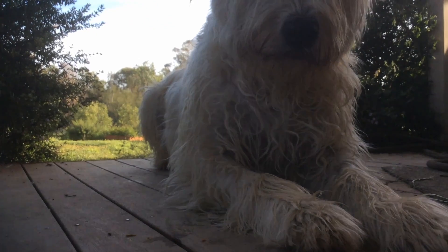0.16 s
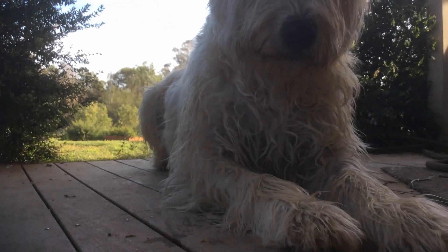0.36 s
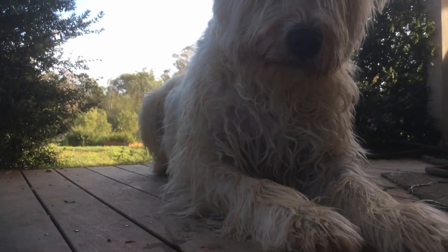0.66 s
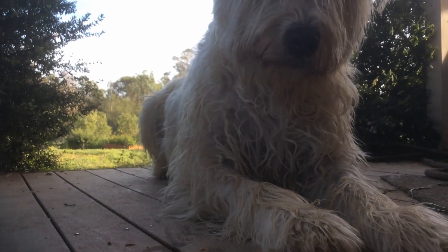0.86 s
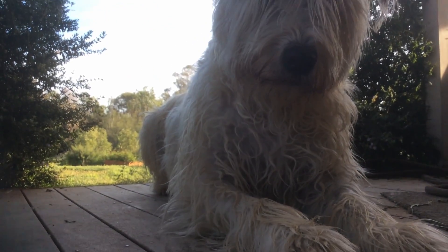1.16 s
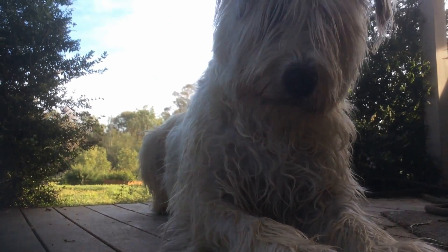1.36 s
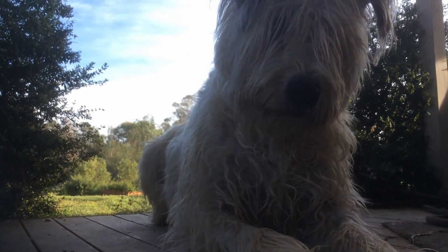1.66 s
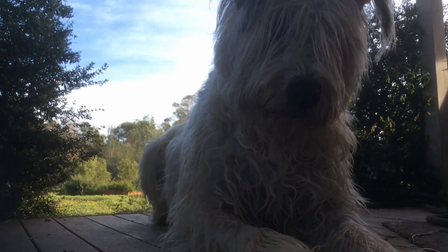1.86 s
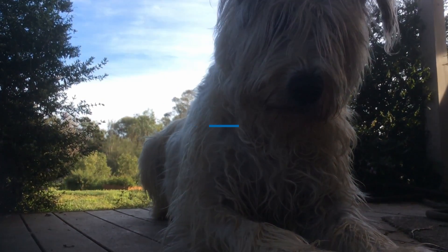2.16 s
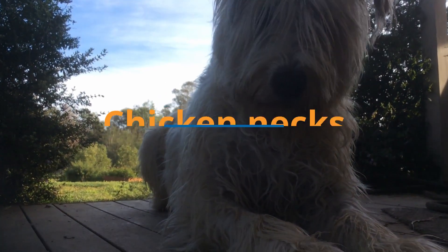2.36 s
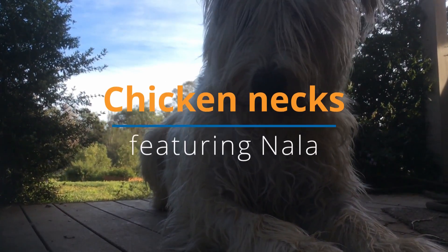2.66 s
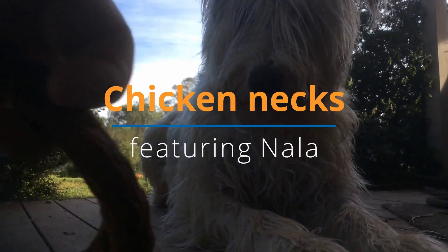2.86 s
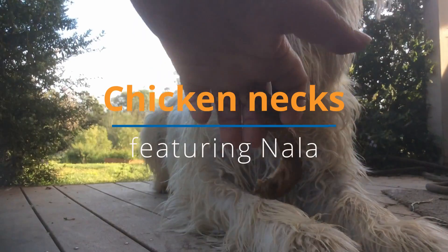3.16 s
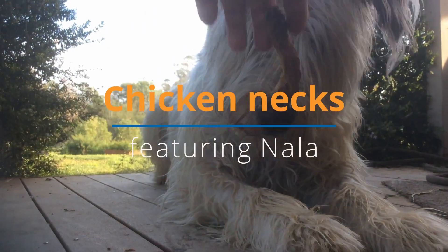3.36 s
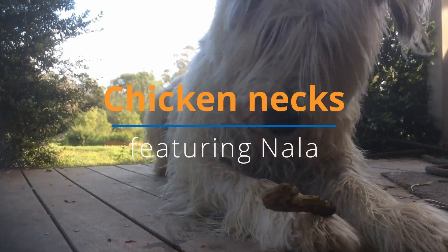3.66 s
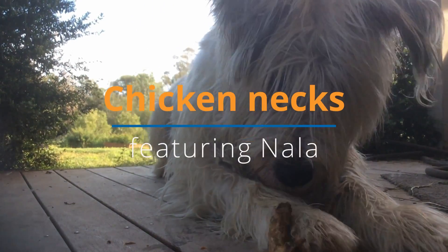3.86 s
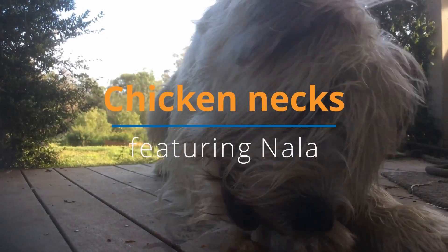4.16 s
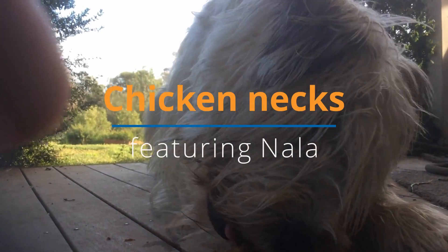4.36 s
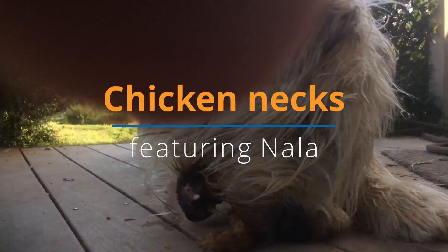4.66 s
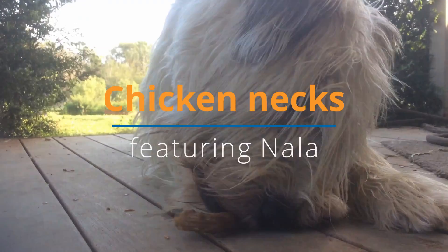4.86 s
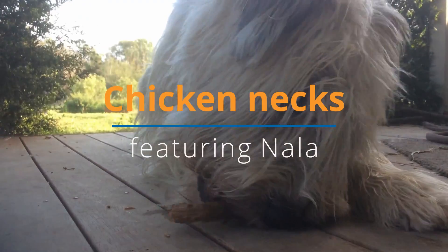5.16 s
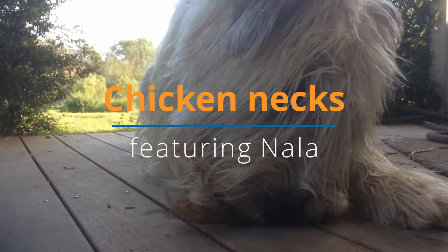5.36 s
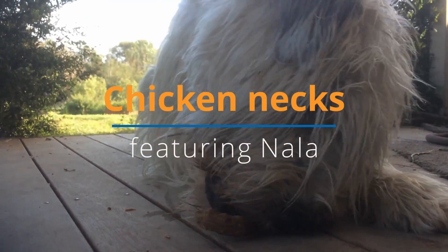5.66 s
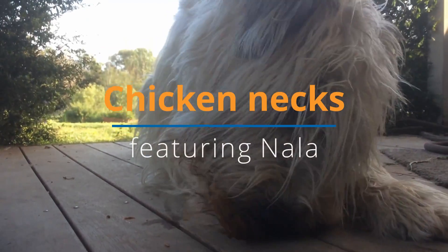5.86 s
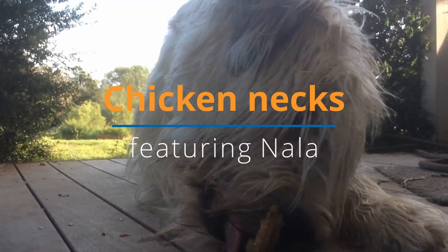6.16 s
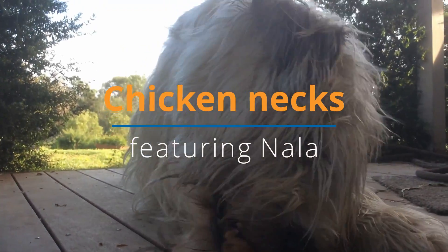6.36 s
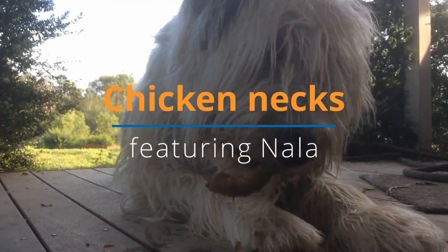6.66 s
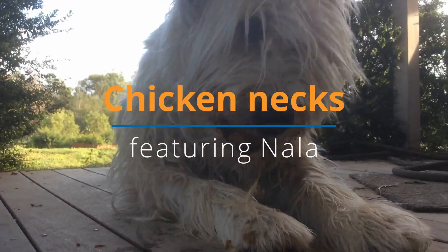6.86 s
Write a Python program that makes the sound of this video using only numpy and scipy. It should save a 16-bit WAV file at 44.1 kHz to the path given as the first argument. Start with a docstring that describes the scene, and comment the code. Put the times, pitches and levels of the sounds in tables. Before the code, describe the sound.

A quiet outdoor rush with faint hiss and sparse, distant bird chirps runs throughout. From 0.1 s fingers handle a camera right at the microphone: a loud hollow knock near 0.18 s, smaller taps until 0.6 s, then rubbing strokes and gritty scuffs, firmest around 1.2 to 1.6 s and 2.0 s. Tiny nail ticks precede a hollow plastic clack at 2.44 s as it rocks to rest on wooden boards by 2.6 s. A calm gap holds a bird chip at 2.76 s. At 3.74 s a dried bony treat hits the deck, bouncing again at 3.95 s. From 4.1 s a dog's muzzle shuffles and short jerky scrapes sound; a brief sniff comes near 4.8 s. Teeth knock and crack from 4.9 s, busy at 5.3 to 5.45 s, with the sharpest crunches at 5.9 to 6.05 s and more around 6.45 s. A stuttering drag follows at 6.73 s, then soft wet mouth smacks near 6.95 s.

```python
"""Over a quiet outdoor rush, fingers knock and rub a camera, which is set down on a wooden veranda.
A dried bony treat then drops and bounces; a dog noses it, drags it and cracks it between its teeth.
Struck bodies are sums of damped modes and band-passed bursts, friction is shaped noise of uneven grain,
and breaking is noise of very unequal grains. Small birds, gliding sines, call in the garden behind.
"""
import sys
import numpy as np
from scipy import signal
from scipy.fft import rfft, irfft, next_fast_len
from scipy.io import wavfile
from scipy.ndimage import map_coordinates

SR = 44100
rng = np.random.default_rng(int(sys.argv[2]) if len(sys.argv) > 2 else 0)


def master_out(mix):
    """Clip the mix to full scale and print it as 16-bit PCM to the path in sys.argv[1]."""
    frames = np.transpose(np.atleast_2d(mix))
    ceiling = np.clip(frames, -1, 1)
    pcm = np.round(ceiling * 32767).astype(np.int16)
    wavfile.write(sys.argv[1], SR, pcm)


N = 309582
CLOCK = np.arange(N) / SR
T = np.arange(SR // 3) / SR  # time within one blow
TOP_HZ = 16300  # upper band limit

# Levels inside one blow are relative to its force; spectra and modes give relative levels.

# Garden. Bird notes: start_s, length_s, start_hz, middle_hz, end_hz, level_db, pitch_tremble_hz
BIRD_NOTES = [(0.254, 0.053, 6900, 5540, 5400, -58, 240), (1.099, 0.15, 5240, 5250, 5080, -60.5, 340),
              (1.107, 0.097, 3500, 3420, 3480, -62.5, 230), (1.117, 0.082, 2690, 2620, 2600, -64, 220),
              (3.18, 0.46, 1300, 1273, 1217, -66, 22.1), (3.294, 0.032, 5380, 5130, 5100, -68.5, 130),
              (3.382, 0.049, 4800, 4560, 4570, -68.5, 129), (3.521, 0.037, 7200, 7240, 7220, -68.5, 110),
              (3.603, 0.021, 7300, 7190, 7100, -66.5, 120), (3.685, 0.05, 5150, 4750, 5070, -59, 130),
              (4.058, 0.025, 4590, 4450, 4350, -65, 100), (4.889, 0.081, 9800, 9640, 9350, -62, 50),
              (5.168, 0.2, 9140, 9470, 9220, -58.5, 49.5), (5.564, 0.06, 5760, 5050, 4740, -58, 70),
              (5.64, 0.11, 4100, 3050, 2580, -61, 55), (5.677, 0.02, 3350, 3480, 3450, -60, 50),
              (5.719, 0.045, 3080, 3450, 3670, -57, 69.4)]
# bands of one short, harsh bird chip: band_hz, level_db
CHIP_BANDS = [(2230, -6.5), (3260, -2), (5500, -7), (8970, -5.5)]
CHIP_AT_S, CHIP_DB, CHIP_T60_S, CHIP_WANDER_HZ = 2.757, -59, 0.13, 451
BIRD_FLUTTER_DB = 1.5  # the notes waver on their way through the trees
# spectrum of the outdoor rush: frequency_hz, density_db_per_hz
RUSH_SPECTRUM = [(25, -27.5), (55, -8.5), (84, -0.5), (135, -15.5), (200, -14.5), (270, -17), (600, -23.5),
                 (1300, -29.5), (2200, -38.5), (5000, -40), (9000, -37), (16000, -47)]
RUSH_DB = -57
# level of a faint hiss: time_s, level_db
HISS_LEVEL = [(0, -56.5), (.7, -67.5), (2.3, -65.5), (2.7, -74), (3.9, -69), (4.5, -55.5), (5.2, -66),
              (6.4, -57.5), (7, -56.5)]
# spectrum of the hiss: frequency_hz, density_db_per_hz
HISS_SPECTRUM = [(1000, 3.0), (4500, -2.0), (7000, -3.5), (9300, 1.5), (12000, -9.5), (16000, -19.5)]
# decay of the roof and wall reflections: frequency_hz, t60_s
VERANDA_DECAY = [(150, 0.65), (600, 0.22), (2500, 0.12), (6000, 0.064), (14000, 0.14)]

# Camera. Finger knocks: start_s, force_db, sharpness_db, hollow_hz
FINGER_KNOCKS = [(0.11, -43.5, -25, 415), (0.169, -33.5, -4, 590), (0.1792, -14.5, -6.5, 684),
                 (0.191, -25.5, -30, 585), (0.4174, -29.5, -5.5, 640), (0.5053, -24.5, -3.5, 645),
                 (0.556, -33, -42, 560), (0.5899, -26.5, -11.5, 648), (0.603, -37.5, -6, 643),
                 (0.61, -37.5, -11, 655), (0.87, -42.5, -38, 456), (1.213, -41.5, -14, 522),
                 (1.352, -44, -11, 522), (1.614, -34, -36, 554), (1.691, -32.5, -27, 560),
                 (2.176, -38.5, -8, 346), (2.251, -40.5, -4.5, 705), (2.295, -38.5, -15, 600),
                 (2.3478, -31, -25, 458), (2.3723, -35, -26, 484), (2.426, -35.5, -13, 454)]
HAND_T60_S = 0.02  # the hand damps the housing
# a fleshier knock sounds lower and thuds more
THUD_DB, THUD_HZ, THUD_DB_PER_OCTAVE = -10.5, 510, 31.5
# camera rocking to rest on the deck: start_s, force_db, sharpness_db, hollow_hz, t60_s
CAMERA_LANDINGS = [(2.4375, -17.5, 2.5, 699, 0.053), (2.446, -27, 0, 546.6, 0.2),
                   (2.461, -32.5, -19, 570, 0.11), (2.468, -37, -11, 720, .05),
                   (2.497, -37.5, -7, 696, 0.079), (2.51, -34, 4, 582, 0.1), (2.535, -33, -21, 684, .04),
                   (2.5453, -25, -12.5, 546, 0.13), (2.6007, -33, -13.5, 715, 0.063)]
LANDED_THUD_DB = -6  # thud of the deck under the camera
TICK_DB = -19.5  # treble tick under the clack of the case
HOLLOW_WANDER_HZ = 5.6  # the loose housing never rings quite true
# modes of the camera on the deck: mode_hz, level_db, t60_s (before damping)
STAND_MODES = [(116, -19, 0.15), (193.4, -1, 0.26)]
# modes of the camera's case: mode_hz, level_db, t60_s (before damping)
CASE_MODES = [(1025, -2, 0.018), (1136, 6, 0.066), (1414, 1, 0.045), (2047, 1.5, 0.025),
              (2586, -9.5, 0.028), (3266, -7.5, 0.032)]
# fingernail ticks on the housing: start_s, level_db, ring_hz
NAIL_TICKS = [(0.1786, -35, 5570), (2.237, -54.5, 8300), (2.2573, -47, 9570), (2.2849, -33.5, 10050),
              (2.294, -47, 9550), (2.306, -50, 9500), (2.317, -46.5, 9630), (2.326, -46.5, 9000),
              (2.348, -50, 9500), (2.362, -51.5, 9260), (2.372, -51.5, 8930)]
# finger strokes over the housing: start_s, length_s, rub_db, rumble_db (before the common trim)
FINGER_STROKES = [(0.095, 0.12, -43.5, -40), (0.305, 0.092, -36, -39.5), (0.497, 0.13, -35, -45.5),
                  (0.77, 0.089, -52, -62), (0.865, 0.051, -45, -41), (0.925, 0.033, -42, -44),
                  (1.045, 0.2, -48.5, -84), (1.205, 0.027, -34, -52), (1.448, 0.14, -32.5, -48.5),
                  (1.47, 0.055, -33, -44.5), (1.6, 0.093, -36, -39.5), (1.79, 0.0185, -46.5, -42.5),
                  (1.89, 0.68, -71, -53), (1.98, 0.03, -44, -60.5), (2.012, 0.093, -28.5, -40.5),
                  (2.13, 0.28, -41.5, -38), (2.48, 0.19, -54, -41)]
STROKE_ATTACK_S, STROKE_SAG_DB_PER_S, STROKE_RELEASE_S = 0.011, 21.5, 0.11
# the resting grip (before the common trim), until the hand leaves
HOLD_RUB_DB, HOLD_RUMBLE_DB, LET_GO_S = -61, -65, 2.72
# spectra of skin rubbing, of the low rumble and of a firm scuff: frequency_hz, density_db_per_hz
RUB_SPECTRUM = [(250, -22.5), (420, -5.5), (550, 8), (660, 3), (780, 3), (1050, -15.5), (1350, -8.5),
                (1600, -11.5), (1950, -15), (2300, -28), (3200, -27), (5000, -34), (10000, -30),
                (16000, -44)]
RUMBLE_SPECTRUM = [(50, -53), (110, -0.5), (200, -4.5), (340, 7.5), (450, -22.5), (700, -37)]
SCUFF_SPECTRUM = [(500, -26.5), (900, 1.5), (1800, 4), (2600, -16), (6000, -19.5), (16000, -30)]
STICK_SLIP_DB, STICK_SLIP_RATE = 3.5, 520  # skin catches finely on the housing (dB, catches a second)
SCUFF_DB, SCUFF_GRAIN_DB = -16.5, 7  # a firm stroke also scuffs, brighter and grittier

# Dog. Muzzle pushes: start_s, length_s, shuffle_db, fur_db (before the trim of each)
MUZZLE_PUSHES = [(4.1, 0.12, -34.5, -51.5), (4.22, .15, -62, -48.5), (4.68, 0.23, -50, -43.5),
                 (4.96, 0.097, -35.5, -48.5), (5.16, 0.031, -31.5, -81), (5.38, 0.15, -31.5, -49.5),
                 (5.67, 0.12, -35.5, -75), (6.06, 0.021, -32, -72), (6.13, 0.13, -59, -49),
                 (6.3, 0.051, -47.5, -86), (6.52, 0.23, -44.5, -49), (6.73, 0.15, -63, -41.5)]
PUSH_ATTACK_S, PUSH_SAG_DB_PER_S, PUSH_RELEASE_S = 0.018, 29, 0.19
REST_SHUFFLE_DB, REST_FUR_DB = -49.5, -61  # the lowered head is never quite still (before the trims)
# spectra of muzzle on wood, of fur and of air in the nose: frequency_hz, density_db_per_hz
SHUFFLE_SPECTRUM = [(50, 7.5), (110, -3), (270, 7), (420, 3.5), (850, 4.5), (1200, -21.5), (1700, -15),
                    (3000, -44.5)]
FUR_SPECTRUM = [(1000, 5), (2000, 15.5), (4700, 12), (6500, 8.5), (9000, 9), (12000, -14), (16000, -14.5)]
NOSE_SPECTRUM = [(410, -47), (700, 0), (1400, 3), (1680, 0), (2240, 11.5), (2700, 5), (3070, 8.5),
                 (5470, 2.5), (7990, 8.5), (16000, -8.5)]
# level of one long sniff: time_s, level_db
SNIFF_LEVEL = [(4.48, -70), (4.58, -61), (4.73, -55), (4.78, -41), (4.82, -39.5), (4.845, -52.5),
               (4.87, -71)]
# wet clicks of the lips parting: start_s, level_db
LIP_CLICKS = [(5.3712, -38), (5.4523, -49.5), (5.8679, -39), (5.8815, -37.5), (5.8848, -35)]
# soft hollow smacks of the mouth: start_s, level_db, cavity_hz
MOUTH_SMACKS = [(6.921, -40, 604), (6.973, -38.5, 665), (6.998, -44.5, 872), (7.011, -41, 776)]
SMACK_ATTACK_S, SMACK_T60_S = 0.0014, 0.036

# Treat. Drags over the wood: start_s, length_s, first_stick_s, rasp_db, tick_db (before the mix of each jerk)
TREAT_DRAGS = [(4.122, .056, 0.015, -59, -59.5), (4.204, .055, .014, -60, -57.5),
               (4.311, .075, 0.0068, -57, -54.5), (6.1371, 0.064, .0145, -45.5, -54.5),
               (6.73, .146, .043, -44.5, -51.5)]
# what the dragged treat rings with at every jerk: mode_hz, level_db, t60_s
JERK_MODES = [(840, 8.5, 0.066), (1713, -1, 0.05), (3990, 0.5, 0.054), (4560, 2, 0.04), (4970, 4.5, 0.031),
              (8340, -1, 0.029)]
STICK_S, STICK_SETTLING = 0.0135, 0.36  # steady time between jerks; part of the excess left after each
JERK_JITTER_S, JERK_SCATTER_DB = 0.0004, 0.9  # no two jerks are alike
# modes of the deck, of the treat's body and of its bone: mode_hz, level_db, t60_s (before damping)
DECK_MODES = [(102.3, -16, 0.25), (207.8, -7, 0.16), (243.3, -3, 0.18), (279, -3.5, 0.14),
              (320.7, -1.5, 0.09), (348.5, -0.5, 0.12), (370, -8.5, 0.03)]
BODY_MODES = [(515, 0.5, 0.14), (715, -6.5, 0.23), (811, -2.5, 0.16), (959, -2, 0.12), (1135, -21, 0.12)]
BONE_MODES = [(1358, 2.5, 0.044), (1452, 3, 0.063), (1550, -3.5, 0.14), (1920, -18.5, 0.031),
              (2505, -18, 0.13), (3530, -23, 0.025)]
# falls and bounces of the loose treat: start_s, force_db, sharpness_db, deck_weight_db, bone_hz
TREAT_FALLS = [(3.7392, -19, -9, 0, 1520), (3.745, -23.5, -17.5, 1, 1486), (3.752, -29.5, -15, 10, 1500),
               (3.776, -44.5, -6, 15, 1550), (3.9466, -20, -20.5, -1, 1494),
               (4.003, -27.5, -19.5, -1, 1427), (4.0384, -36.5, -40, 2.5, 1430), (4.053, -46, -32, 4, 1460),
               (4.4263, -28.5, -21, -8.5, 1840), (4.438, -41.5, -25, 6, 1780)]
# teeth working the held treat: start_s, force_db, sharpness_db, deck_weight_db, mouth_hz
TOOTH_BITES = [(4.228, -38, -5, -18, 837), (4.366, -31, -16.5, -1, 1402), (4.466, -48.5, 7.5, 5, 890),
               (4.872, -31, -14, 0.5, 578), (4.885, -34.5, -7.5, -8, 900), (4.9205, -32, -16, -13, 924),
               (4.9834, -39.5, -11, 2, 800), (4.997, -28, -6.5, 3, 938), (5.146, -30, -41, -4.5, 827),
               (5.155, -41.5, -40, -10, 1130), (5.168, -42, -34, 1, 817), (5.29, -29, -10, -11, 800),
               (5.31, -27, -21, -16, 870), (5.326, -25, -13, -15, 790), (5.3563, -32, -13.5, -0.5, 790),
               (5.371, -27, -11, -0.5, 560), (5.403, -34, -13.5, -16, 780), (5.4226, -22.5, -35, -5, 830),
               (5.4533, -36.5, -17, 2, 540), (5.4928, -53.5, 7.5, 3, 794), (5.681, -45.5, -34, -17, 1030),
               (5.692, -37.5, -25, 2.5, 606), (5.713, -41.5, -31, 3, 606), (5.738, -42.5, -20, 2, 986),
               (5.745, -45.5, 8, -4, 897), (5.7807, -33.5, -6.5, -4, 884), (5.828, -37, -12.5, -0.5, 880),
               (5.8822, -32, -8.5, -4, 926), (5.89, -28.5, -7, 3, 1284), (5.894, -21, -18, -10, 962),
               (5.902, -39, 10.5, 12.5, 703), (5.9673, -54.5, 11.5, -12, 1100),
               (5.978, -26.5, -21.5, -15, 896), (6.0215, -40.5, 1.5, -17, 880),
               (6.0362, -19, -3.5, -19, 910), (6.0419, -20.5, -7, -3.5, 1450), (6.0459, -39.5, 1, -1, 897),
               (6.371, -43, -12, -28, 800), (6.4318, -30, -28, 0, 1330), (6.4532, -34.5, -28, 7, 1310),
               (6.458, -32.5, 5, 6.5, 546), (6.472, -31.5, 5, 0, 1550), (6.4957, -39.5, -22, 13.5, 1450),
               (6.576, -28, -33, -30, 950), (6.608, -41, -32, -24, 900)]
# porous bone caving in between the teeth: start_s, rise_s, level_db
BONE_CRUNCHES = [(4.879, 0.0063, -38.5), (5.427, 0.0056, -40.5), (5.887, 0.005, -27),
                 (5.9761, 0.003, -31.5), (6.031, 0.006, -28.5), (6.455, 0.0025, -29.5)]
# spectra of a sharp break and of crushed bone: frequency_hz, density_db_per_hz
SNAP_SPECTRUM = [(300, -98), (1500, 0.5), (2800, -1.5), (3500, 4), (4400, -1), (5300, 1), (6600, -3),
                 (8400, -4.5), (11000, -12.5), (16000, -24.5)]
CRUSH_SPECTRUM = [(600, -29.5), (1500, 1.5), (4000, 2.5), (6500, -2), (8300, 2.5), (16000, -19.5)]
LOOSE, HELD = 0.84, 0.45  # freedom of the treat to ring: factors on t60
LOOSE_BONE_DB, LOOSE_RING_DB = 0.5, -0.5  # the free bone's modes, and its ring around the struck resonance
IMPACT_DB = 1.5  # the first hard instant of a fall
HELD_BONE_DB, BONE_PER_SHARPNESS = -4.5, 0.43  # sharp contacts ring the bone more
# the hollow between the jaws, retuned by every bite
MOUTH_DB, MOUTH_T60_S, MOUTH_WANDER_HZ = -0.1, 0.044, 40
LEAD_IN_DB, LEAD_IN_T60_S = -26, 0.031  # faint noise rising into each bite
CRUMB_DB, CRUMB_SPREAD_S = -24, 0.032  # splinters that follow a bite
CRACKLE_DB, CRUNCH_GRAIN_DB = 10, 8  # spread in size of the crackle's grains, and of the fractures


def amp(db):
    """Logarithmic level: decibels to gain."""
    return 10 ** (np.asarray(db) / 20)


def unit(x):
    """Normalization: scale to rms 1."""
    return x / np.sqrt(np.mean(x ** 2) + 1e-20)


def along(points, hz):
    """Logarithmic pitch scale: (Hz, value) points interpolated on a log axis."""
    f, v = np.transpose(points)
    return np.interp(np.log(hz + 1), np.log(f + 1), v)


def level_curve(rows):
    """Envelope: gain at every sample from (s, dB) points."""
    s, db = np.transpose(rows)
    return amp(np.interp(CLOCK, s, db))


def wobble(rate):
    """Band-limited fluctuation: a smooth random curve, rate knots a second."""
    knots = rng.standard_normal(int(N * rate / SR) + 4)
    return map_coordinates(knots, [CLOCK * rate])


def colour(x, spectrum):
    """Minimum-phase filtering: a causal filter of the given spectrum, built by folding its cepstrum."""
    m = 2 * next_fast_len(len(x))
    gain = amp(along(spectrum, np.fft.rfftfreq(m, 1 / SR)))
    cepstrum = irfft(np.log(gain), m)
    cepstrum[1:m // 2] *= 2
    cepstrum[m // 2 + 1:] = 0
    return irfft(rfft(x, m) * np.exp(rfft(cepstrum)), m)[:len(x)]


def band(x, lo_hz, hi_hz):
    """Frequency selection: a causal band-pass."""
    hi_hz = min(max(hi_hz, lo_hz + 20), SR / 2 - 20)
    return signal.sosfilt(signal.butter(3, [lo_hz, hi_hz], "band", fs=SR, output="sos"), x)


def friction(spectrum, grain_db, rate):
    """Random excitation: noise of rms 1 whose strength varies in small catches, rate a second."""
    grain = amp(grain_db * np.clip(wobble(rate), -2, 2))
    return unit(colour(rng.standard_normal(N) * grain, spectrum))


def burst(t60, spike):
    """Contact force: one spike, then exponentially dying chatter."""
    force = rng.standard_normal(len(T)) * amp(-60 * T / t60)
    force[0] += spike
    return force


def ring(modes, freedom, scatter_db):
    """Modal superposition: damped modes, excited a little differently by every blow."""
    hz, db, t60 = np.transpose(modes)[:, :, None]
    size, detune, sign = rng.standard_normal((3, len(modes), 1))
    swing = np.sign(sign) * np.sin(2 * np.pi * hz * (1 + 0.012 * detune) * T)
    decay_db = db + scatter_db * size - 60 * T / (t60 * freedom)
    return np.sum(amp(decay_db) * swing, axis=0)


def resonance(hz, t60, attack_s, wander_hz):
    """Line broadening: one damped resonance whose random phase drift widens its line by wander_hz."""
    drift = np.cumsum(rng.standard_normal(len(T))) * np.sqrt(2 * np.pi * wander_hz / SR)
    return np.sin(2 * np.pi * hz * T + drift) * amp(-60 * T / t60) * (1 - np.exp(-T / attack_s))


def blow(x, db=0):
    """Onset level: set the rms of the first hundredth of a second."""
    return amp(db) * x / np.sqrt(np.mean(x[:SR // 100] ** 2) + 1e-20)


def add(track, s, x):
    """Linear superposition: mix x into the track at time s."""
    part = track[max(round(s * SR), 0):][:len(x)]
    part += x[:len(part)]


def gestures(rows, attack_s, sag_db_per_s, release_s):
    """Amplitude envelopes: each (s, length, dB, dB) movement rises, sags while it lasts and dies away."""
    gains = np.zeros((2, N))
    for s, length, *levels_db in rows:
        t = np.maximum(CLOCK - s, 0)
        fade_db = -sag_db_per_s * t - 60 * np.maximum(t - length, 0) / release_s
        gains += amp(levels_db)[:, None] * np.minimum(t / attack_s, 1) * amp(fade_db)
    return gains


def veranda(x):
    """Reverberation: roof and wall answer with a noise tail, dying slowest in the bass."""
    hz, t, z = signal.stft(rng.standard_normal(SR // 2), SR, nperseg=256)
    decay = amp(-60 * t / along(VERANDA_DECAY, hz)[:, None])
    tail = signal.istft(z * decay, SR, nperseg=256)[1]
    delayed = np.pad(tail / np.linalg.norm(tail), (SR // 200, 0))  # the answer starts 5 ms late
    return signal.fftconvolve(x, delayed)[:N]


def birds():
    """Frequency modulation: sines glide along parabolas with a hoarse tremble; a chip is broadened lines."""
    out = np.zeros(N)
    tremble = wobble(1200)
    for s, length, start_hz, middle_hz, end_hz, db, hoarse_hz in BIRD_NOTES:
        u = np.linspace(0, 1, round(length * SR))
        glide = np.polyval(np.polyfit([0, .5, 1], [start_hz, middle_hz, end_hz], 2), u)
        pitch = glide + hoarse_hz * tremble[round(s * SR):][:len(u)]
        swell = np.sqrt(np.abs(np.sin(np.pi * u)))
        add(out, s, amp(db) * swell * np.sin(2 * np.pi * np.cumsum(pitch) / SR))
    for hz, db in CHIP_BANDS:
        add(out, CHIP_AT_S, blow(resonance(hz, CHIP_T60_S, 0.0025, CHIP_WANDER_HZ), CHIP_DB + db))
    return out * amp(BIRD_FLUTTER_DB * wobble(35))


def garden():
    """Background noise: reverberant birds over a quiet outdoor rush and a hiss of changing level."""
    calls = birds()
    rush = amp(RUSH_DB) * friction(RUSH_SPECTRUM, grain_db=1.5, rate=14)
    hiss = level_curve(HISS_LEVEL) * friction(HISS_SPECTRUM, grain_db=6.0, rate=11)
    return calls + veranda(calls) + rush + hiss


def housing(db, sharp_db, thud_db, hz, t60):
    """Shell vibration: one knock gives a thud, a hollow resonance, the clack of the case and a tick."""
    freedom = t60 / 0.07  # the hand damps the case, the deck lets it ring
    thud = blow(band(burst(0.05, spike=14), 190, 450)) + blow(ring(STAND_MODES, freedom, scatter_db=3.5), -4.5)
    hollow = resonance(hz, t60, 0.0068, HOLLOW_WANDER_HZ)
    body = blow(hollow) + blow(band(burst(t60, spike=11.0), 452.7, 1000), -6.5)
    clack = blow(ring(CASE_MODES, freedom, scatter_db=7.0), -0.12)
    clack += blow(band(burst(0.54 * t60, spike=6.4), 730, 2520))
    tick = band(burst(0.018, spike=1.6), 3500, 9600)
    knock = blow(thud, thud_db) + blow(body) + blow(clack, sharp_db) + blow(tick, sharp_db + TICK_DB)
    return amp(db) * knock


def camera():
    """Impact and friction: fingers knock and slide on the housing, then it is set down on the deck."""
    out = np.zeros(N)
    for s, db, sharp_db, hz in FINGER_KNOCKS:
        thud_db = THUD_DB - THUD_DB_PER_OCTAVE * np.log2(hz / THUD_HZ)
        add(out, s, housing(db, sharp_db, thud_db, hz, HAND_T60_S))
    for s, db, sharp_db, hz, t60 in CAMERA_LANDINGS:
        add(out, s, housing(db, sharp_db, LANDED_THUD_DB, hz, t60))
    for s, db, hz in NAIL_TICKS:
        tick = burst(0.013, spike=2.1)
        add(out, s, blow(band(tick, 0.84 * hz, 1.25 * hz), db) + blow(band(tick, 1800, 17000), db - 10))
    rub, rumble = gestures(FINGER_STROKES, STROKE_ATTACK_S, STROKE_SAG_DB_PER_S, STROKE_RELEASE_S)
    holding = CLOCK < LET_GO_S
    trim = amp(-3.5)
    rub_gain = trim * (rub + amp(HOLD_RUB_DB) * holding)
    out += rub_gain * friction(RUB_SPECTRUM, grain_db=STICK_SLIP_DB, rate=STICK_SLIP_RATE)
    scuff_gain = amp(SCUFF_DB) * rub * np.sqrt(rub / rub.max())  # grows faster than the rub
    out += scuff_gain * friction(SCUFF_SPECTRUM, grain_db=SCUFF_GRAIN_DB, rate=STICK_SLIP_RATE)
    rumble_gain = trim * (rumble + amp(HOLD_RUMBLE_DB) * holding)
    return out + rumble_gain * friction(RUMBLE_SPECTRUM, grain_db=2.0, rate=90)


def dog():
    """Friction, turbulence and cavity resonance: muzzle on boards, rustling fur, one sniff, lips and mouth."""
    push, brush = gestures(MUZZLE_PUSHES, PUSH_ATTACK_S, PUSH_SAG_DB_PER_S, PUSH_RELEASE_S)
    head_down = CLOCK > MUZZLE_PUSHES[0][0]
    shuffle_gain = amp(-10.0) * (push + amp(REST_SHUFFLE_DB) * head_down)
    shuffle = shuffle_gain * friction(SHUFFLE_SPECTRUM, grain_db=9.0, rate=180)
    fur_gain = amp(-9.5) * (brush + amp(REST_FUR_DB) * head_down)
    fur = fur_gain * friction(FUR_SPECTRUM, grain_db=4.0, rate=860)
    sniffing = (CLOCK > SNIFF_LEVEL[0][0]) * (CLOCK < SNIFF_LEVEL[-1][0])
    sniff = sniffing * level_curve(SNIFF_LEVEL) * friction(NOSE_SPECTRUM, grain_db=2.0, rate=130)
    out = shuffle + fur + sniff
    for s, db in LIP_CLICKS:
        add(out, s, blow(band(burst(0.008, spike=6.7), 7000, 13000), db))
    for s, db, hz in MOUTH_SMACKS:
        envelope = amp(-60 * T / SMACK_T60_S) * (1 - np.exp(-T / SMACK_ATTACK_S))
        cavity = np.sin(2 * np.pi * hz * T) * envelope
        add(out, s, blow(cavity, db) + blow(band(burst(0.039, spike=2.4), 350, 2440), db - 12.0))
    return out


def drag():
    """Stick-slip: the treat moves over the wood in uneven dry jerks that settle to a steady rate."""
    out = np.zeros(N)
    for start, length, stick, rasp_db, tick_db in TREAT_DRAGS:
        sticks = STICK_S + (stick - STICK_S) * STICK_SETTLING ** np.arange(8)
        delays = np.cumsum(sticks) - sticks
        for delay in delays[delays < length]:
            late, size = rng.standard_normal(2)
            rasp = blow(ring(JERK_MODES, 1, scatter_db=1), 4)
            rasp += blow(band(burst(0.066, spike=4.7), 560, 1760), -3.6)
            rasp += blow(band(burst(0.03, spike=4), 2960, 6500), -3.2)
            tick = blow(band(burst(0.039, spike=4), 6500, 10700), tick_db + 3.0)
            jerk = amp(JERK_SCATTER_DB * size) * (amp(rasp_db) * rasp + tick)
            add(out, start + delay + JERK_JITTER_S * late, jerk)
    return out


def crackle(t60):
    """Random impulses: a dying run of tiny grains of very unequal size."""
    return burst(t60, spike=0) * amp(CRACKLE_DB * np.clip(rng.standard_normal(len(T)), -3, 3))


def thump():
    """Plate vibration: the boards under a blow."""
    return blow(ring(DECK_MODES, 0.86, scatter_db=2.0)) + blow(band(burst(0.088, spike=3.9), 170, 446), -7.0)


def fall(db, sharp_db, weight_db, hz):
    """Free vibration: the loose treat hits the deck, its bone rings around hz and rattles on the wood grain."""
    knock = blow(ring(BODY_MODES, LOOSE, scatter_db=2.5), -6) + blow(band(burst(0.042, spike=9), 430, 850), -2)
    bone = blow(ring(BONE_MODES, 0.77, scatter_db=2.5), LOOSE_BONE_DB)
    bone += blow(band(burst(0.07, spike=11.5), 0.89 * hz, 1.12 * hz), LOOSE_RING_DB)
    impact = blow(band(burst(0.006, spike=40), 0.35 * hz, 1.34 * hz), IMPACT_DB)
    snap = blow(colour(burst(0.015, spike=7.9), SNAP_SPECTRUM), sharp_db)
    rattle = blow(band(burst(0.17, spike=0), 1770, 4900), sharp_db - 6.5)
    return amp(db) * (blow(thump(), weight_db) + knock + bone + impact + snap + rattle)


def bite(db, sharp_db, weight_db, hz):
    """Damped vibration and fracture: teeth press and break the treat; the jaws add their hollow at hz."""
    # the whole deck flexes under the jaw
    deck = thump() + blow(ring([(106.4, 0, 0.1)], 1, scatter_db=2), -12.5)
    knock = blow(ring(BODY_MODES, HELD, scatter_db=6))
    knock += blow(band(burst(0.027, spike=8.6), 0.64 * hz, 1.24 * hz), 2.7)
    knock += blow(resonance(hz, MOUTH_T60_S, 0.0016, MOUTH_WANDER_HZ), MOUTH_DB)
    bone = blow(ring(BONE_MODES, HELD, scatter_db=1), -2.7)
    bone += blow(band(burst(0.04, spike=5.2), 1410, 2110), -1.6)
    bone += blow(band(burst(0.028, spike=18.0), 1650, 3720), -10)
    bone_db = HELD_BONE_DB + BONE_PER_SHARPNESS * sharp_db
    snap = blow(colour(burst(0.0177, spike=9.1) + 0.11 * crackle(0.011), SNAP_SPECTRUM), sharp_db)
    return amp(db) * (blow(deck, weight_db) + blow(knock) + blow(bone, bone_db) + snap)


def crunch(rise_s):
    """Collapse of a porous solid: a swarm of tiny fractures swells for rise_s and dies away."""
    u = T / rise_s
    sizes = amp(CRUNCH_GRAIN_DB * np.clip(rng.standard_normal(len(T)), -2, 2))
    fractures = rng.standard_normal(len(T)) * sizes
    return colour(fractures * (u * np.exp(-u)) ** 2, CRUSH_SPECTRUM)


def treat():
    """Impact, then fracture: the treat falls and bounces; the teeth then hold it, crack it and crush it."""
    out = np.zeros(N)
    for s, *fall_row in TREAT_FALLS:
        add(out, s, fall(*fall_row))
    for s, db, sharp_db, weight_db, mouth_hz in TOOTH_BITES:
        add(out, s, bite(db, sharp_db, weight_db, mouth_hz))
        # faint noise rising into each bite: a decay turned round in time
        lead_in = blow(colour(crackle(LEAD_IN_T60_S), SNAP_SPECTRUM), sharp_db)
        lead_in += blow(band(burst(LEAD_IN_T60_S, spike=0), 360, 1670))
        add(out, s - len(T) / SR, amp(db + LEAD_IN_DB) * lead_in[::-1])
        # splinters after it
        for delay in CRUMB_SPREAD_S * rng.random(size=2):
            crumb = band(burst(0.012, spike=11), 2500, 16000)
            add(out, s + delay, blow(crumb, db + sharp_db + CRUMB_DB))
    for s, rise_s, db in BONE_CRUNCHES:
        add(out, s, blow(crunch(rise_s), db))
    return out


def scene():
    """Direct and reflected sound: dog, treat and handling under the veranda roof, before the garden."""
    meal = treat() + drag() + dog()
    handling = camera()
    near = meal + amp(-13.5) * veranda(meal) + handling + amp(-22.0) * veranda(handling)
    # the microphone passes little deep bass from the near sounds
    return (band(near, 70, 20000) + garden())[None]


def record(dry):
    """Saturation and band-limiting: the camera clips at full scale and keeps nothing above TOP_HZ."""
    m = next_fast_len(N + SR // 2)
    spectrum = rfft(np.clip(dry, -1, 1), m)
    return irfft(spectrum * (np.fft.rfftfreq(m, 1 / SR) < TOP_HZ), m)[..., :N]


dry = scene()
out = record(dry)
master_out(out)
```